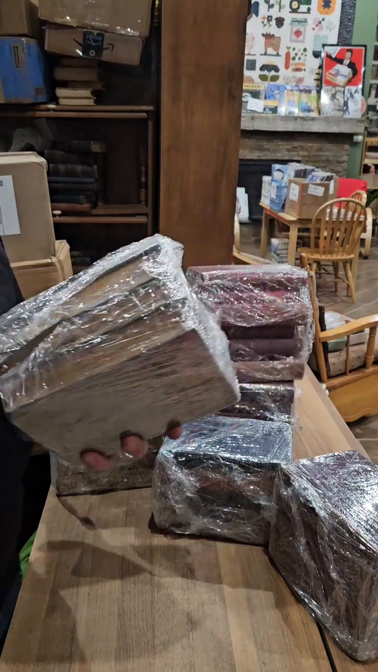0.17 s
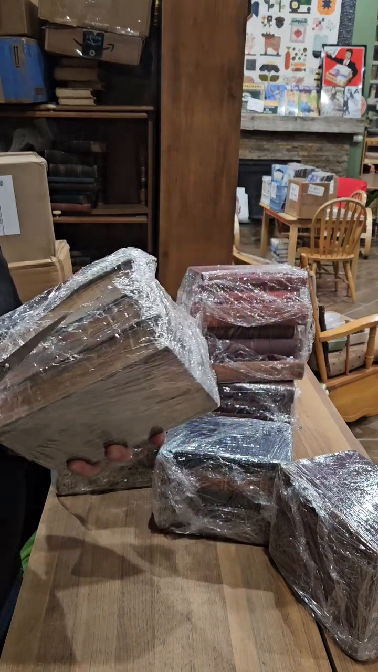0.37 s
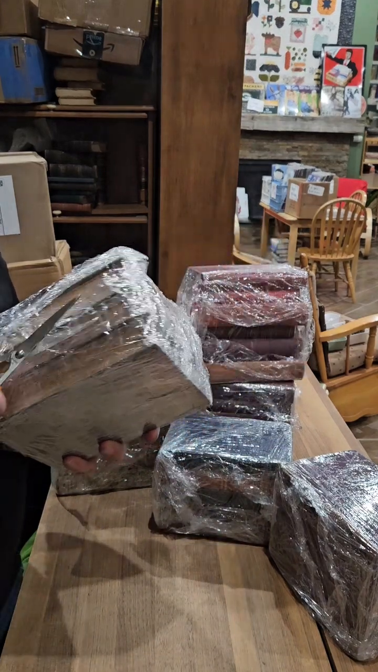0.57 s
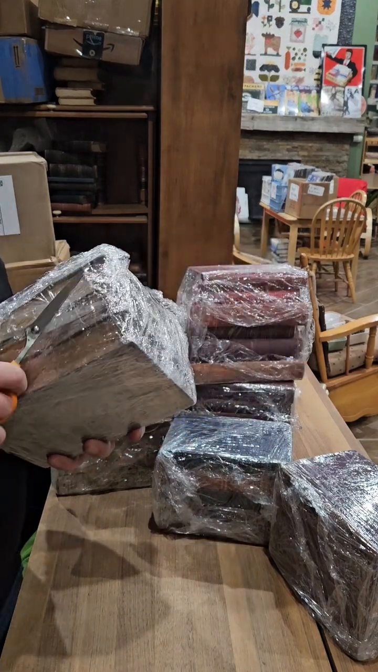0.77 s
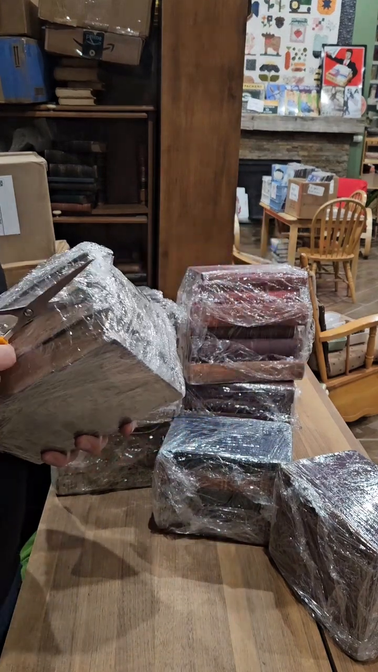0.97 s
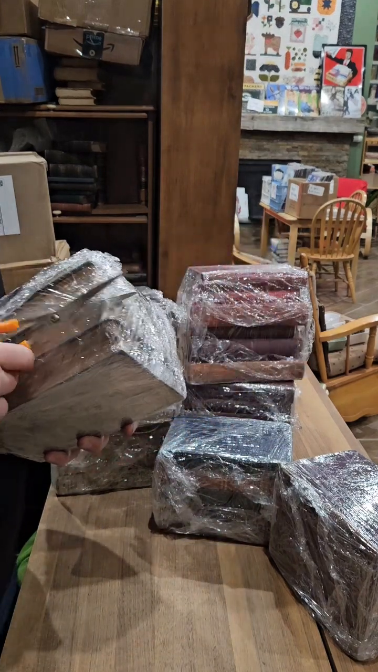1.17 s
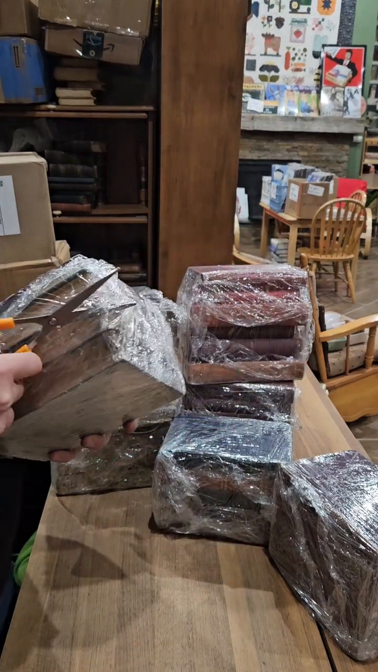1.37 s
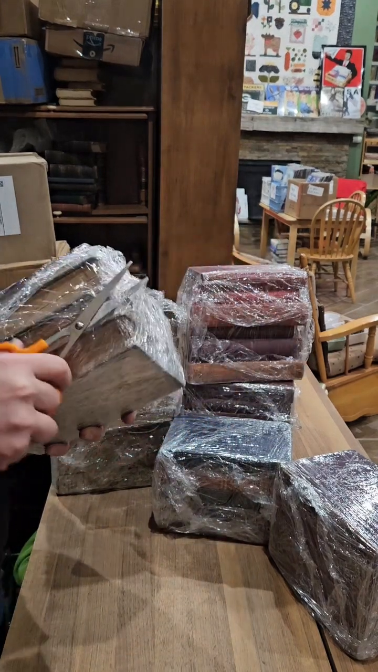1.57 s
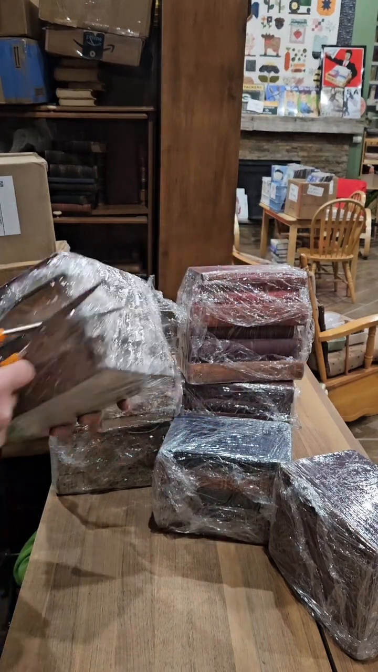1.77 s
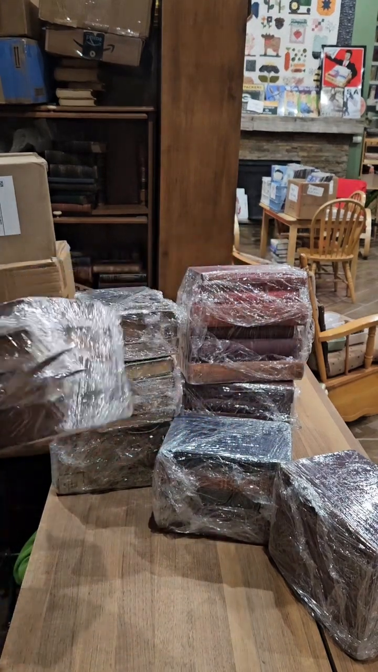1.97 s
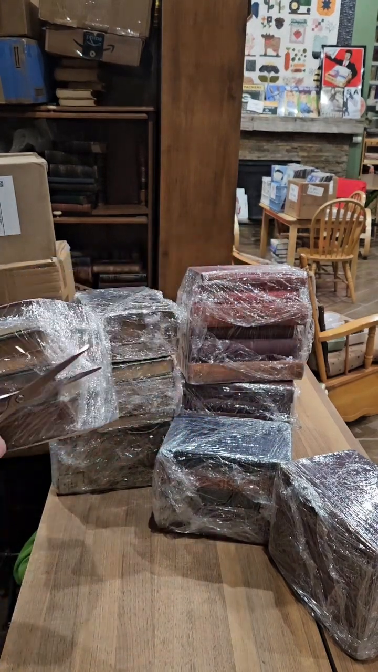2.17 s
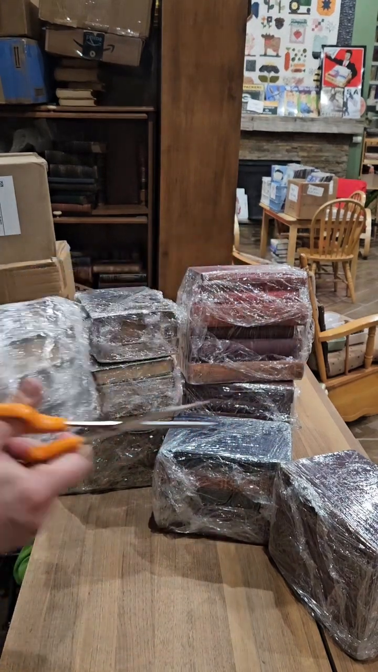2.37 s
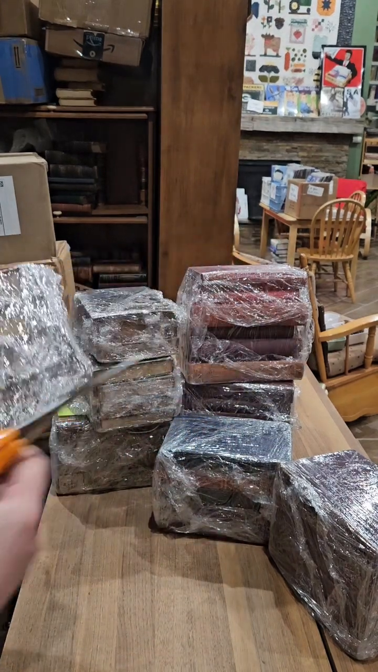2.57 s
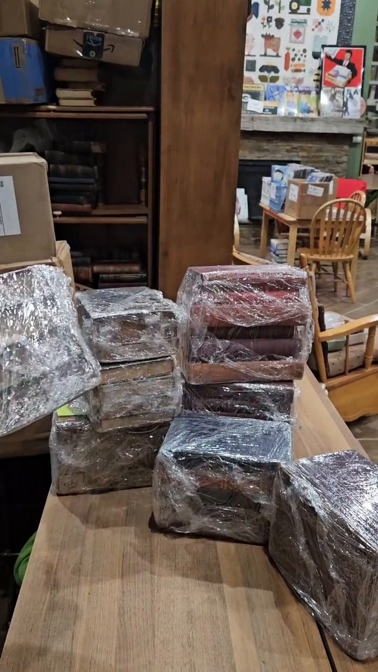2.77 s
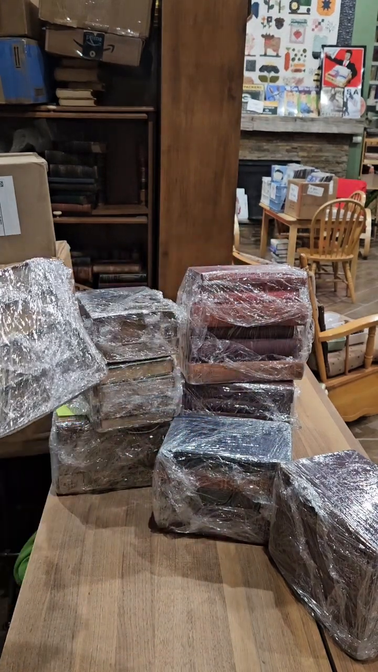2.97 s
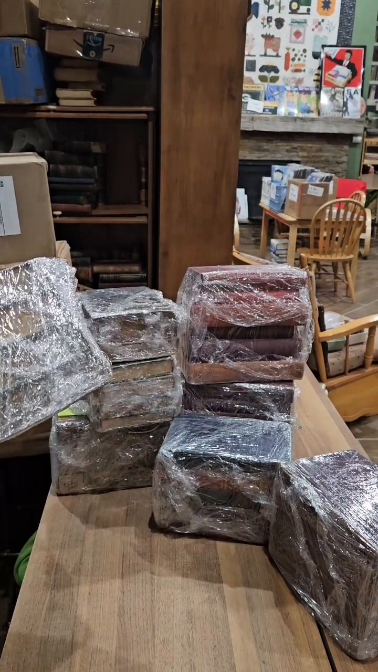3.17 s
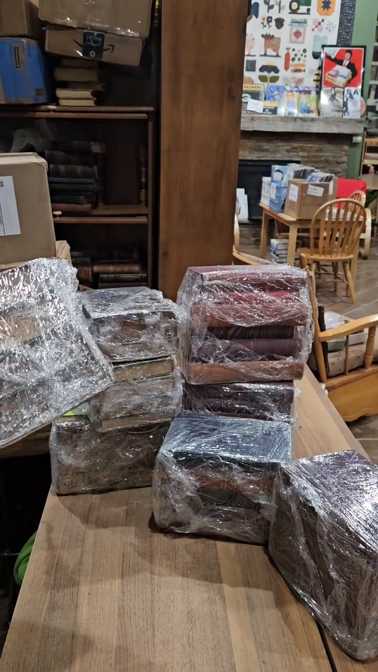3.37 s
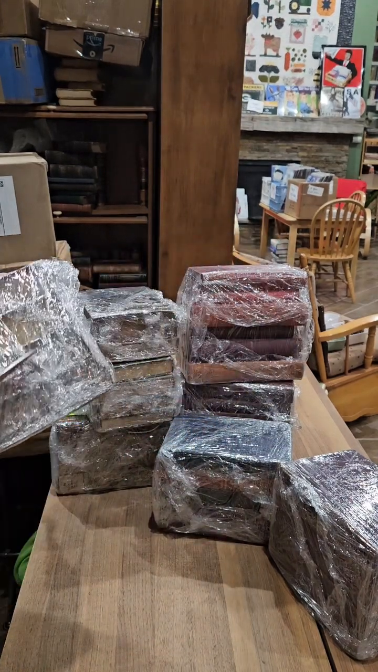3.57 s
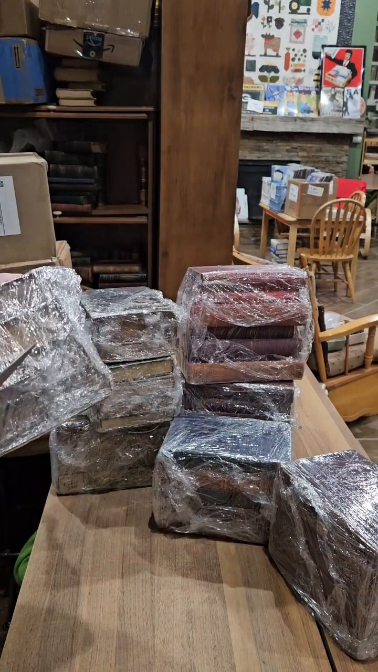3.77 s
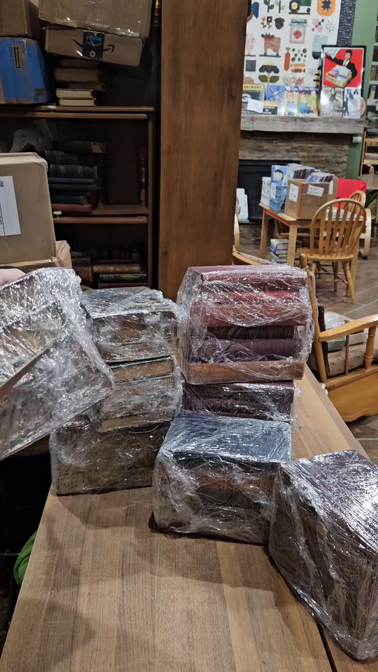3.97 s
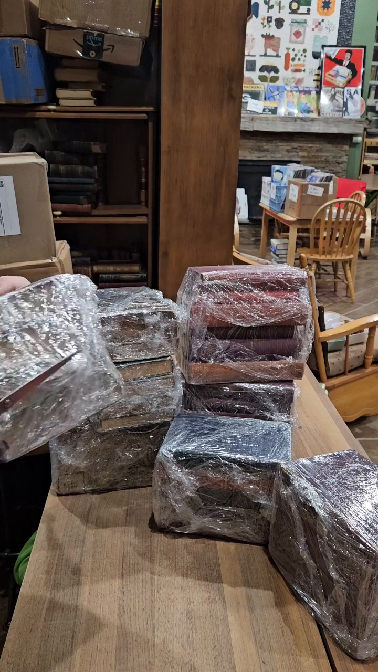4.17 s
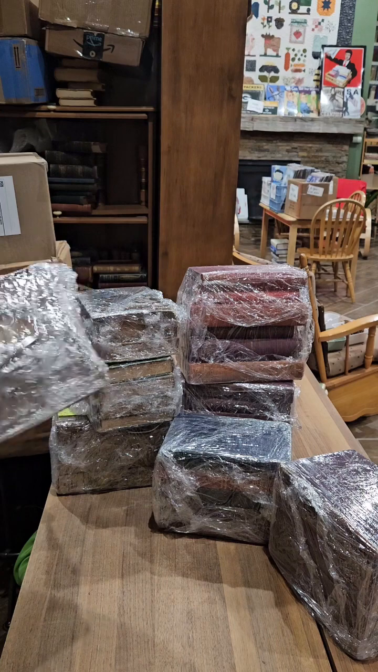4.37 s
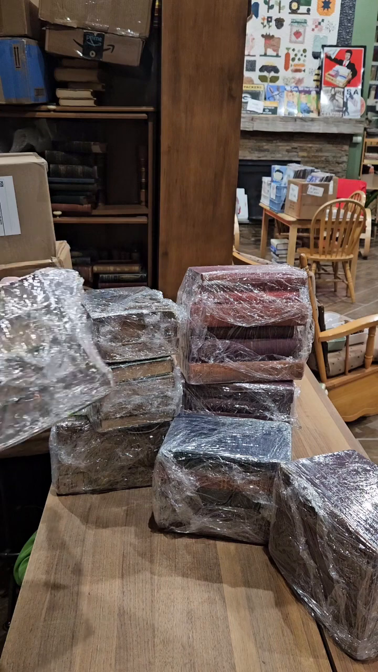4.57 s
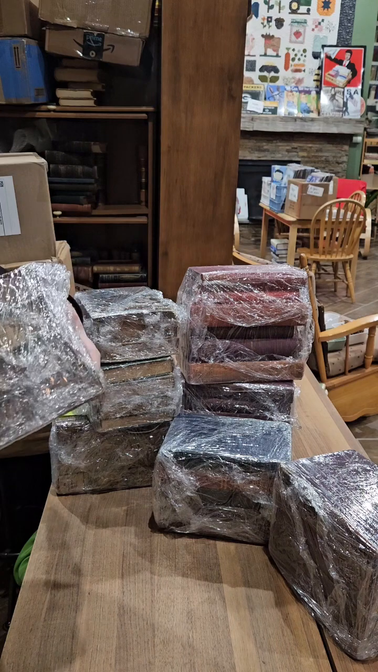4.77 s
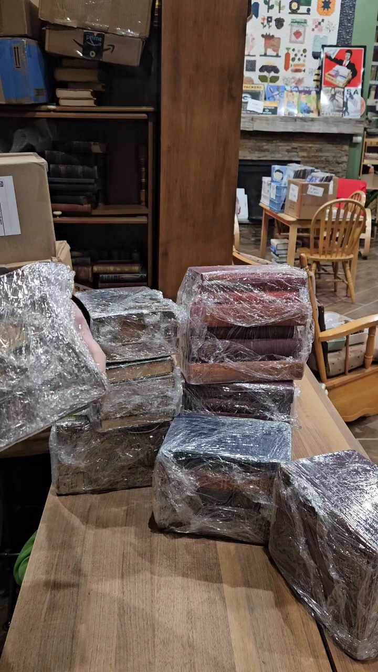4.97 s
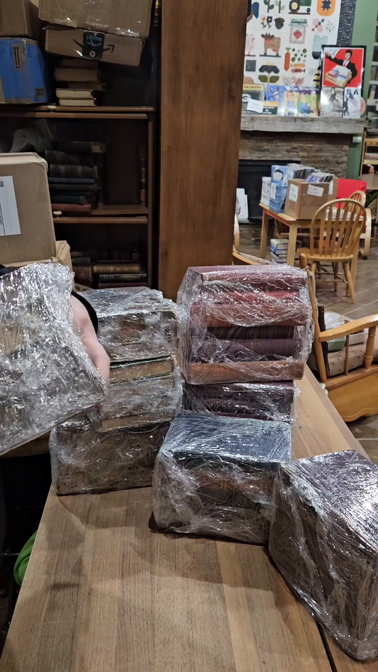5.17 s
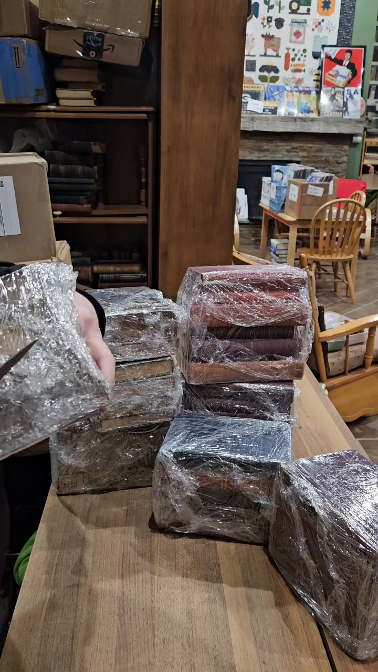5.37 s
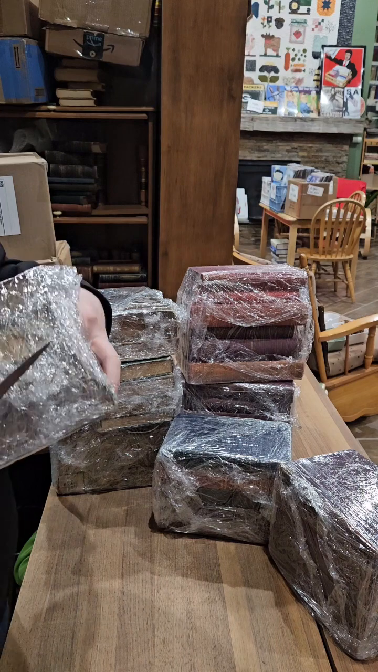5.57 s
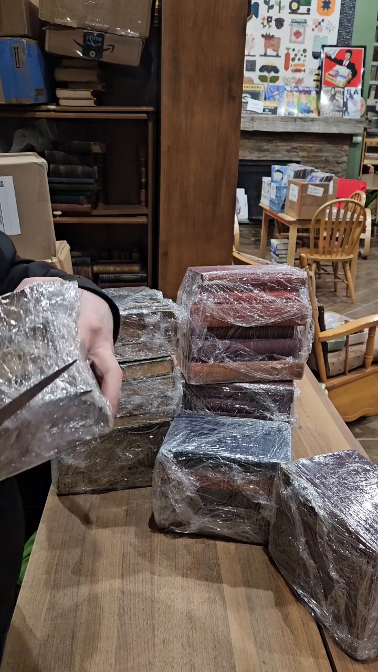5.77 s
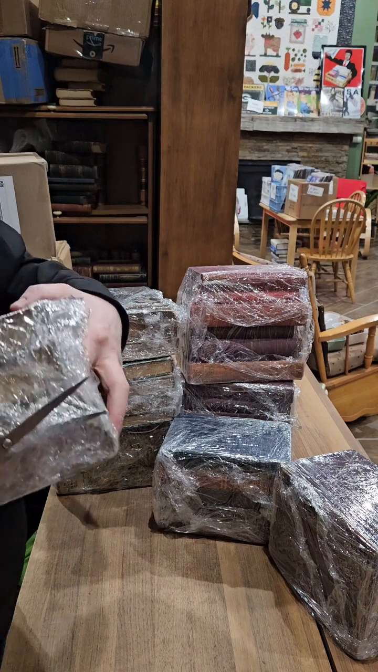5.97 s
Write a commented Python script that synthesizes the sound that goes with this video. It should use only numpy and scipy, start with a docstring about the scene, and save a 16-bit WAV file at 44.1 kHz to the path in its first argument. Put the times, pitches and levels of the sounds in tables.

```python
"""Stretch wrap crinkles first: a bundle of hardcover books is turned and picked at over a wooden
table in a quiet shop. The taut film is swarms of tiny noise buckles, with louder single snaps on top.
The covers rub as stick-slip noise; the books bump dully in the hands as decaying low modes, and once
knock down hard as two filtered pushes and a thud. Full shelves keep the room's answer short: noise
reflections with a soft tail, over a steady filtered-noise hush."""
import sys
import numpy as np
from scipy import signal
from scipy.fft import rfft, irfft, next_fast_len
from scipy.io import wavfile
from scipy.ndimage import uniform_filter1d

SR = 44100
rng = np.random.default_rng(int(sys.argv[2]) if len(sys.argv) > 2 else 0)


def write(x):
    x = np.atleast_2d(x).T
    wavfile.write(sys.argv[1], SR, np.round(np.clip(x, -1, 1) * 32767).astype(np.int16))


N = 265923


def amp(db):
    """Decibels to gain."""
    return 10 ** (np.asarray(db) / 20)


def unit(x):
    """Scale to rms 1."""
    return x / np.sqrt(np.mean(x ** 2) + 1e-20)


def along(points, hz):
    """Read (frequency, value) points on a log frequency axis."""
    f, v = np.transpose(points)
    return np.interp(np.log(hz + 1), np.log(f + 1), v)


def curve(points):
    """Draw (time, value) points as one value per sample."""
    s, v = np.transpose(points)
    return np.interp(np.arange(N) / SR, s, v)


def filtered(x, response):
    """Multiply the spectrum of x by a response of frequency."""
    size = next_fast_len(N + SR // 2)
    hz = np.fft.rfftfreq(size, 1 / SR)
    return irfft(rfft(x, size) * response(hz), size)[..., :N]


def coloured(x, spectrum, size=4096):
    """Causal filter of unit energy with the given spectrum."""
    log_gain = np.log(amp(along(spectrum, np.fft.rfftfreq(size, 1 / SR))))
    # folding the cepstrum forward in time gives minimum phase
    cepstrum = irfft(log_gain)
    cepstrum[1:size // 2] *= 2
    cepstrum[size // 2 + 1:] = 0
    kernel = irfft(np.exp(rfft(cepstrum)))
    kernel /= np.linalg.norm(kernel)
    return signal.oaconvolve(x, kernel[None], axes=1)[:, :N]


def dipped(x, dips):
    """Weaken narrow bands of x."""
    def response(f):
        gain = 1
        for centre, width, depth in dips:
            band = 1j * f * width / (centre * centre - f * f + 1j * f * width)
            gain = gain * (1 - np.clip(depth, 0, 1) * band)
        return gain
    return filtered(x, response)


def add(track, s, sound):
    """Mix a sound into a track at time s."""
    part = track[..., max(round(s * SR), 0):][..., :sound.shape[-1]]
    part += sound[..., :part.shape[-1]]


# stereo image: freq_hz, likeness of left and right [0-1]
STEREO_LIKENESS = [(100, 0.8), (350, 0.91), (700, 0.81), (1500, 0.8), (3000, 0.45), (5500, 0.19),
                   (8000, 0.1), (11000, 0.046)]


def spread(pair):
    """Turn two unrelated signals into left and right, much alike in the lows and hardly in the treble."""
    def middle_and_side(hz):
        turn = np.arccos(np.clip(along(STEREO_LIKENESS, hz), 0, 1)) / 2
        return np.array([np.cos(turn), np.sin(turn)])
    mid, side = filtered(pair, middle_and_side)
    return np.array([mid + side, mid - side])


def swells(rows, roundness=1.45):
    """Sum the power of hand movements that rise to a peak and fall; roundness above 1 rounds the top."""
    t, power = np.arange(N) / SR, np.zeros(N)
    for s, db, rise, fall in rows:
        near = slice(*np.searchsorted(t, [s - 5 * abs(rise), s + 5 * abs(fall)]))
        away = np.abs((t[near] - s) / np.where(t[near] < s, rise, fall))
        power[near] += amp(db - 10 * away ** roundness) ** 2
    return power


# tugs and shifts of the grip: peak_s, relative level_db, rise_s, fall_s
# (each over 10 dB; the sign of a time is ignored, and a zero fall stops at the peak)
TUGS = [(0.153, -31, .02, 0.0637), (0.195, -36.5, .015, 0.07), (0.275, -40.5, .01, 0.1),
        (0.325, -33, .04, 0.08), (0.44, -40.5, 0.011, -0.01), (0.485, -38, 0.033, 0.06),
        (0.614, -38.5, .008, 0.08), (0.698, -33, 0.051, 0.0465), (0.803, -40.5, .014, 0.07),
        (0.903, -30.5, .024, 0.0971), (1.12, -29.5, 0.042, 0.0832), (1.265, -39, 0.085, .032),
        (1.38, -41.5, 0.012, 0.18), (1.524, -40, 0.029, 0.06), (1.614, -37, 0.061, 0.05),
        (1.684, -34.5, 0.0097, 0.08), (1.81, -42, .06, 0.1), (1.87, -42.5, 0.017, 0.02),
        (1.997, -41.5, .012, 0.1555), (2.218, -41, .009, -0.01), (2.365, -30, 0.061, 0.0272),
        (2.962, -50, .019, 0.06), (3.08, -56.5, 0.028, 0.07), (3.343, -43.5, .036, .07),
        (3.445, -39.5, 0.041, 0.13), (3.608, -32, .02, 0.06), (3.812, -34.5, 0.056, 0.12),
        (4.008, -39, .08, 0.17), (4.146, -33, .034, 0.05), (4.262, -37, 0.1, 0.0432),
        (4.408, -33.5, 0.068, 0.0776), (4.53, -47.5, .01, .05), (4.687, -46, 0.02, 0.1),
        (5.306, -32, 0.035, .055), (5.385, -41.5, 0.038, 0.24), (5.52, -39, 0.029, 0.26),
        (5.672, -34, 0.044, 0.06), (5.742, -27.5, 0.023, 0.03), (5.945, -37, 0.11, -0.68)]
# the held film, never quite at rest between tugs: time_s, relative level_db
HOLD = [(0, -52), (0.055, -61), (0.09, -50), (0.4, -53.5), (1.9, -47.5), (2.25, -50), (2.5, -58),
        (2.66, -56), (2.85, -66.5), (3.14, -62), (3.55, -51), (4.45, -48.5), (4.62, -64), (4.75, -57.5),
        (5.02, -53), (5.08, -70), (5.2, -50.5), (6.03, -47)]


def effort():
    """How hard the film is worked, as a power: the tugs on top of the hold."""
    return swells(TUGS) + amp(curve(HOLD)) ** 2


def clumps(rate, t60):
    """A flicker of power with mean 1: random bursts, rate a second, start at once and die away."""
    starts = rng.random(N) * (rng.random(N) < rate / SR)
    fade = amp(-60 * np.arange(SR // 5) / SR / t60) ** 2
    power = np.abs(signal.oaconvolve(starts, fade)[:N])
    return power / power.mean()


def buckles(kicks, t60, hz, focus, relative_width=0.52, size=1024):
    """Each kick sets a facet of film shivering: fading noise plus a share (focus) ringing around hz."""
    fade = amp(-60 * np.arange(size) / SR / t60) ** 2
    power = np.abs(signal.oaconvolve(kicks ** 2, fade / fade.sum())[:len(kicks)])
    shiver = np.sqrt(power) * rng.standard_normal((2, len(kicks)))
    pole = np.exp(2j * np.pi * hz / SR - np.pi * hz * abs(relative_width) / SR)
    ring = signal.lfilter([1, 0, -1], np.poly([pole, pole.conjugate()]).real, shiver)
    # the mix keeps the mean power of the kicks
    return unit(unit(shiver) + focus * unit(ring)) * np.sqrt(np.mean(power))


def swarm(rate, scatter_db, t60, low_hz, high_hz, focus, count=7):
    """Facets of count sizes buckle at random, rate a second, evened out to an rms near 1."""
    happens = rng.random(N) < rate / SR
    sizes = amp(scatter_db * np.minimum(rng.standard_normal(N), 2)) * happens
    which = rng.integers(count, size=N)
    power = np.abs(uniform_filter1d(sizes ** 2, size=1000))
    sizes = sizes / np.sqrt(power + np.mean(power) / 20)
    total = np.zeros((2, N))
    for k, hz in enumerate(np.geomspace(low_hz, high_hz, count)):
        total += buckles(sizes * (which == k), t60, hz, focus)
    return total


# tone of the film: freq_hz, relative density_db (per Hz)
FILM_TONE = [(50, -59), (120, -23), (300, -14.5), (700, -1), (1000, -9.5), (1450, 1), (2500, 0.5),
             (4000, -1), (6200, -3.5), (7600, 1), (9000, -5), (10500, -9.5), (13000, -4.5), (15500, -5.5)]
# how bright the crinkle is over time: time_s, treble_gain_db
TREBLE = [(0.3, -0.5), (0.5, 1), (1.1, 0), (1.3, 1.5), (1.65, 1), (1.85, -0.5), (2.4, 2), (2.95, -2),
          (3.35, 1.14), (4.0, 1.3), (4.4, 0), (4.7, 3.1), (5.3, -1), (5.52, 3.5), (6.03, 0.5)]


def crinkle(flurry_db=-19, flurry_t60=.1, flurry_rise=.004, crinkle_db=-1.3, clump_share=.28, edge_hz=5500):
    """The harder the pull, the denser and louder the clumped buckles; each snap sets off more of them."""
    share = np.clip(clump_share, 0, 1)
    power = effort() * amp(crinkle_db) ** 2 * (1 - share + share * clumps(rate=70, t60=.07))
    t = np.arange(SR // 4) / SR
    for s, db, _ in SNAPS:
        flurry = amp(db + flurry_db - 60 * t / flurry_t60) * (1 - np.exp(-t / flurry_rise))
        add(power, s, flurry ** 2)
    level = np.sqrt(power)
    busy = (level / np.mean(level)) ** .5
    # large facets pop one by one, small ones fizz
    pops = swarm(520 * busy, scatter_db=6, t60=0.0069, low_hz=1446, high_hz=7700, focus=1.3)
    fizz = swarm(2600 * busy, scatter_db=3.5, t60=0.0025, low_hz=4500, high_hz=13240, focus=0.65, count=3)
    # a steady scatter of small creases ticks, about 70 a second
    ticks = swarm(70, scatter_db=2, t60=0.003, low_hz=2600, high_hz=8000, focus=1.0, count=4)
    mix = amp(-5.0) * pops + amp(-2) * fizz + amp(-11.5) * ticks / busy
    sound = level * coloured(mix, FILM_TONE)
    treble = filtered(sound, lambda hz: hz ** 4 / (hz ** 4 + edge_hz ** 4))
    return sound + treble * (amp(curve(TREBLE)) - 1)


# slides of the bundle in the hands: peak_s, relative level_db, rise_s, fall_s
# (each over 10 dB; the sign of a time is ignored, and a zero fall stops at the peak)
SLIDES = [(0.34, -52, 0.045, -0.2), (0.475, -49.5, .025, 0), (0.67, -50, 0.038, 0.12),
          (0.92, -49, 0.072, 0.08), (1.19, -53.5, 0.062, .07), (1.85, -60, .12, 0.26),
          (2.42, -55, 0.025, 0.13), (3.35, -53.5, 0.028, -0.15), (3.44, -56.5, 0.054, 0),
          (3.64, -56, .02, -0.57), (5.13, -57.5, 0.023, .05), (5.37, -50, 0.1, -0.15),
          (5.715, -49.5, 0.03, -0.25), (5.99, -60.5, .02, -3)]
# tone of rubbed covers: freq_hz, relative density_db (per Hz)
RUB_TONE = [(40, -32.5), (90, -10), (180, -3), (450, 4), (680, 6.5), (950, -25.5), (3000, -52)]


def rubbing(rub_db=-1, drag_db=-29.0):
    """Fingers and film stick and slip on the covers: plainly in a slide, faintly with every tug."""
    level = np.sqrt(amp(rub_db) ** 2 * swells(SLIDES) + amp(drag_db) ** 2 * effort())
    slips = swarm(600, scatter_db=7.0, t60=0.0052, low_hz=190, high_hz=620, focus=0.038, count=2)
    return level * unit(coloured(slips, RUB_TONE))


# decay of the shop's tail: freq_hz, t60_s
SHOP_DECAY = [(100, 0.32), (500, 0.39), (2000, 0.4), (6000, 0.48), (14000, 0.42)]


def shop(x, wet_db=-13, early_db=-9, early_t60=0.023, count=16):
    """Early reflections, drawn anew in each of count equal stretches; a soft tail follows."""
    hz, t, grains = signal.stft(rng.standard_normal((2, SR // 2)), SR, nperseg=256)
    fade = amp(-60 * t / along(SHOP_DECAY, hz)[:, None])
    tail = signal.istft(grains * fade, SR, nperseg=256)[1]
    tail = amp(wet_db) * tail / np.linalg.norm(tail[0])
    late = np.pad(x, (SR // 400, 0))[:N]  # the answer starts 2.5 ms behind
    answer = signal.fftconvolve(late[None], tail, axes=1)[:, :N]
    # table and near bundles answer first
    early_fade = amp(-60 * np.arange(SR // 20) / SR / early_t60)
    for part in np.array_split(np.arange(N), count):
        early = rng.standard_normal((2, SR // 20)) * early_fade
        early = amp(early_db) * early / np.linalg.norm(early, axis=1, keepdims=True)
        add(answer, part[0] / SR, signal.fftconvolve(late[part][None], early, axes=1))
    return spread(answer)


# tone of the shop's air: freq_hz, relative density_db (per Hz)
HUSH_TONE = [(15, -33.5), (25, 5.5), (666, -5.5), (997, -2), (1380, -19), (1950, -11), (4870, 2.5),
             (8350, -7), (9550, -23), (12200, -0.5), (15500, -19)]


def hush(hush_db=-67):
    """The steady air of the shop: filtered stereo noise."""
    air = filtered(rng.standard_normal((2, N)), lambda hz: amp(along(HUSH_TONE, hz)))
    return amp(hush_db) * unit(spread(air))


# the loudest creases snapping through: start_s, relative level_db, ring_hz
SNAPS = [(0.1422, -16.5, 1470), (0.1478, -17, 3780), (0.1828, -22.5, 2240), (0.19, -21, 4300),
         (0.417, -30, 5270), (0.6145, -26, 3100), (0.7903, -25, 4500), (0.8596, -25.5, 3500),
         (0.8784, -21, 1930), (0.9411, -21, 4500), (1.0985, -19, 2540), (1.28, -27.5, 1530),
         (1.6859, -24.5, 3100), (2.117, -27.5, 1330), (2.216, -26, 3100), (2.373, -21, 3770),
         (2.6703, -45, 1690), (2.8898, -45.5, 2570), (2.985, -35, 3530), (3.324, -27.5, 4780),
         (3.351, -24.5, 5570), (3.6005, -20.5, 3030), (3.7915, -20, 3100), (3.872, -21, 1840),
         (4.0027, -19.5, 2280), (4.0524, -23, 4700), (4.1312, -17.5, 3500), (4.218, -21.5, 2880),
         (4.3259, -28, 3980), (4.5239, -22, 4500), (4.6603, -27.5, 2800), (4.68, -28, 2650),
         (4.7677, -32, 2480), (4.809, -34, 4730), (4.888, -32.5, 4200), (4.9593, -31.5, 5340),
         (5.319, -20.5, 5000), (5.3305, -21, 1510), (5.642, -23.5, 3820), (5.7275, -22.5, 3000),
         (5.735, -21, 6500), (5.887, -23.5, 2190)]


def snaps(snap_db=11, t60=0.0035, focus=1.4):
    """Single creases give way, each a brief noise burst with its own ring."""
    track = np.zeros((2, N))
    for s, db, hz in SNAPS:
        add(track, s, amp(db + snap_db) * buckles(signal.unit_impulse(SR // 40), t60, hz, focus))
    return coloured(track, FILM_TONE)


# soft, low contacts as the books bump and shift: start_s, relative level_db, centre_hz
BUMPS = [(0.1487, -37, 476), (0.159, -38.5, 102), (0.619, -35, 440), (0.69, -45, 184), (0.8005, -42.5, 490),
         (0.872, -45, 141), (0.9106, -38, 530), (0.9419, -41, 495), (1.098, -45, 154), (1.099, -28, 490),
         (1.2137, -46, 455), (1.39, -44, 695), (1.396, -53, 169), (1.6909, -44, 650), (1.888, -57.5, 220),
         (2.2323, -46.5, 620), (2.318, -32, 250), (2.3192, -20, 440), (2.365, -38, 228), (2.3719, -22, 474),
         (2.4947, -44, 335), (2.58, -50.5, 388), (2.9864, -38, 390), (3.013, -58, 194),
         (3.4436, -41.5, 510), (3.5928, -38, 650), (3.618, -51, 213), (4.42, -43, 430), (4.423, -54, 200),
         (4.5215, -41, 670), (4.9948, -48, 564), (5.3311, -32, 485), (5.35, -41, 170), (5.384, -36.5, 626),
         (5.713, -41.5, 110), (5.7265, -25, 690), (5.8885, -42, 480)]
# modes the bundle rings with: pitch_hz, relative level_db, t60_s
BOOK_MODES = [(91, -4, 0.23), (115.4, 4, 0.17), (154, -4.5, 0.25), (220.5, 0, 0.17), (271, -1.5, 0.073),
              (358, -10, 0.0196), (461, 0, 0.047), (560, -11.5, 0.027), (690, 1.5, 0.038)]


def bumps(bump_db=6, octaves=0.38, rise_cycles=0.28, scuff_db=-8, scuff_t60=0.06):
    """Each bump rings the modes near its own pitch, low ones swelling more slowly, and the covers scuff."""
    ring, scuff = np.zeros((2, N)), np.zeros(N)
    t = np.arange(SR // 2) / SR
    hz, mode_db, t60 = np.transpose(BOOK_MODES)[:, :, None]
    rise = 1 - np.exp(-(t * hz / rise_cycles) ** 2)
    for s, db, centre_hz in BUMPS:
        nearness = np.exp(-.5 * (np.log2(hz / centre_hz) / octaves) ** 2)
        share = amp(mode_db + 2 * rng.standard_normal(hz.shape)) * nearness
        # every contact detunes the modes a little
        pitch = hz * np.exp(rng.normal(0, 0.026, hz.shape))
        modes = share / share.sum() * rise * amp(-60 * t / t60) * np.sin(2 * np.pi * pitch * t)
        add(ring[0], s, amp(db + bump_db) * modes.sum(0))
        add(scuff, s, amp(db + scuff_db - 60 * t / scuff_t60))
    return ring + coloured(scuff * rng.standard_normal((2, N)), RUB_TONE)


# tone of the hard knock: freq_hz, relative density_db (per Hz)
CRACK_TONE = [(40, -21), (90, -11), (400, 2.5), (900, -15), (1500, 0.5), (2000, 5), (2500, -5), (3300, -10),
              (5000, -6.5), (8000, -7), (11000, -26.5), (16000, -40)]


def knock(crack_db=4, rebound=0.56, weight_db=-26, weight_hz=88, weight_t60=0.087):
    """A hard cover edge strikes: a push, then a millisecond later its rebound and the weight's thud together."""
    push = np.zeros((2, N))
    start_s, back_s = 2.3193, 2.3203
    add(push[0], start_s, amp(crack_db) * np.ones(1))
    add(push[0], back_s, -rebound * amp(crack_db) * np.ones(1))
    sound = coloured(push, CRACK_TONE)
    t = np.arange(SR // 2) / SR
    thud = amp(weight_db - 60 * t / weight_t60) * np.sin(2 * np.pi * weight_hz * t)
    add(sound[0], back_s, thud)
    return sound


# near sound partly cancels against its bounce off the table: centre_hz, width_hz, depth [0-1]
TABLE_DIPS = [(980, 360, 0.2), (1990, 410, 0.63)]


def scene(bass_hz=58):
    """Film and books close by, too small to radiate deep bass, and the shop around them."""
    near = crinkle() + rubbing() + snaps() + bumps() + knock()
    near = signal.sosfilt(signal.butter(5, bass_hz, "high", fs=SR, output="sos"), near)
    return spread(dipped(near, TABLE_DIPS)) + shop(near[0]) + hush()


# a dip in the microphones' treble: centre_hz, width_hz, depth [0-1]
PORT_DIPS = [(9590, 540, 1)]
# tilt of the left microphone, apart from its doubled treble: freq_hz, gain_db
LEFT_TILT = [(150, 1), (550, 1.74), (1400, 3), (3500, .5), (11000, 0.5)]


def record(dry, echo=0.91, echo_delay=0.0008235, top_hz=15650):
    """The microphones colour the sound; the left one also gets the treble a second time, just after."""
    left, right = dipped(dry, PORT_DIPS)

    def left_response(f):
        first = along([(1500, 0.94), (3500, 0.43), (11000, 0.36)], f)
        second = echo * along([(450, 0.11), (2100, 0.93)], f) * np.exp(-2j * np.pi * f * echo_delay)
        return amp(along(LEFT_TILT, f)) * (first + second)

    left = filtered(left, left_response)
    return filtered(np.array([left, right]), lambda hz: hz < top_hz)


dry = scene()
out = record(dry)
write(out)
```